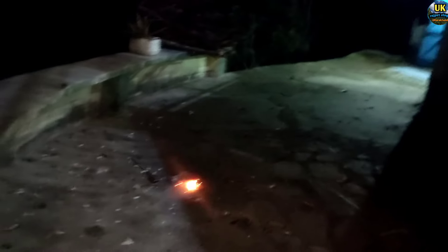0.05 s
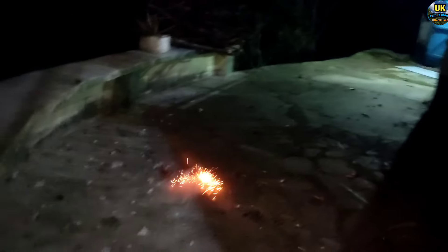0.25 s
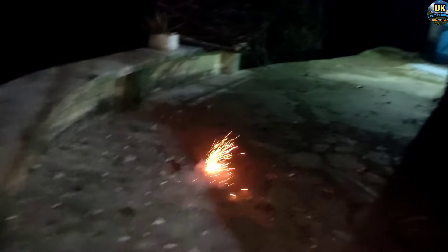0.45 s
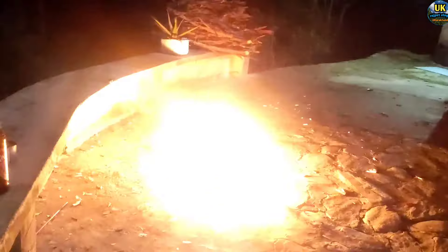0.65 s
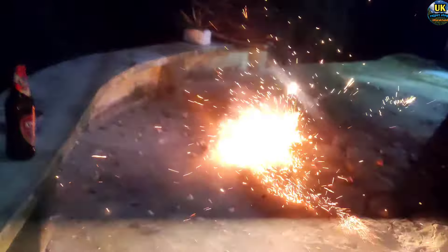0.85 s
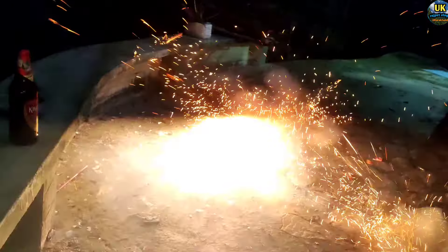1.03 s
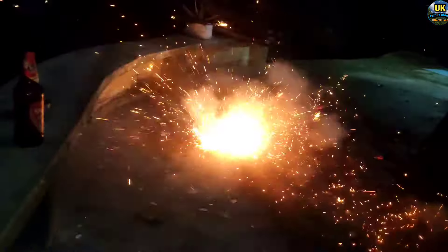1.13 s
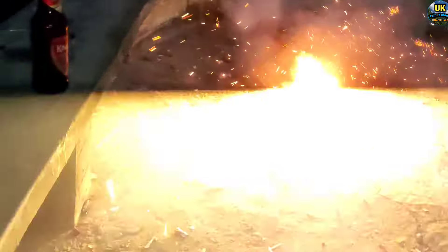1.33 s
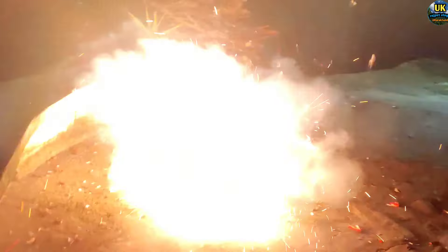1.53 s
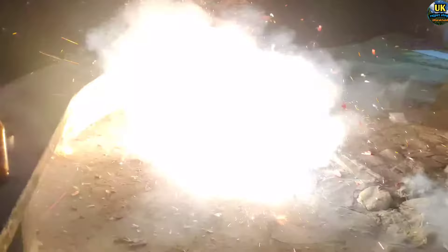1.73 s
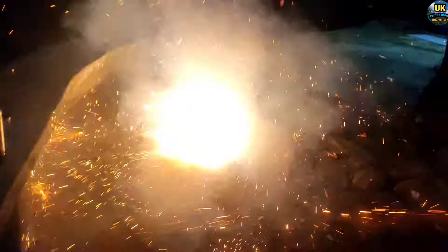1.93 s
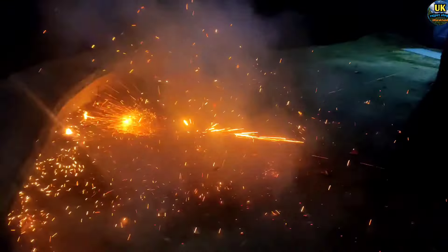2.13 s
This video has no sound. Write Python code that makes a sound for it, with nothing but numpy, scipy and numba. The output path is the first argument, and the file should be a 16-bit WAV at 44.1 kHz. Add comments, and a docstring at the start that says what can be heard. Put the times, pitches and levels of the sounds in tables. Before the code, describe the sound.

A string of firecrackers bursts on a stone terrace at night: a very faint fuse fizz, then a sudden irregular volley of deafening cracks, low thumps and dense echoes, overloading a phone microphone a few metres away.

```python
"""A stone terrace at night: a string of firecrackers goes off a few metres from a phone.
A fuse of three flickering noise bands fizzes. Each blast is a short push-pull pressure pulse with a bright
burst, then dense noise echoes of the low walls and a longer tail from the surroundings; two muffled booms
and a slow membrane wobble add bass. The microphones overload; a look-ahead limiter ducks before a blast,
holds, and lets the tail swell back."""
import sys
import numpy as np
from scipy import signal
from scipy.fft import rfft, irfft
from scipy.io import wavfile
from scipy.ndimage import uniform_filter1d, minimum_filter1d
from numba import njit

SR = 44100
rng = np.random.default_rng(int(sys.argv[2]) if len(sys.argv) > 2 else 0)


def log_audio(samples):
    """Write samples as a 16-bit WAV file to the path given in sys.argv[1]."""
    # one column per channel
    frames = np.atleast_2d(samples).T
    # limit to full scale, then quantise
    limited = np.clip(frames, -1, 1)
    pcm = np.round(limited * 32767).astype(np.int16)
    wavfile.write(sys.argv[1], SR, pcm)


def magnitude_from_level(level_db):
    """Linear magnitude for a level in decibels (20 dB per decade)."""
    exponent = np.asarray(level_db, float) / 20
    return 10 ** exponent


N = 96226  # length in samples

# The blasts; each layer adds its own gain to the levels. Each row: start in seconds, level in dB,
# treble tilt in dB per octave above 1 kHz, low thump in dB, lag of the left echoes in samples.
BLASTS = [(0.7026, 13, -1, -18, 23), (.7670, 26.5, 3, 13.5, -4.5), (0.918, 26.5, 2, 10, 10.5),
          (0.963, 18, 4.5, -40, 17), (.995, 22.5, 3, 4.5, 20.5), (1.028, 15, 3, 2.5, 13),
          (1.077, 20, 2.5, 0.5, 20), (1.383, 25, 2, -22, 18), (1.5351, 26.5, 2.5, 13, 18.5),
          (1.603, 13, 2.5, -12, 18.5), (1.6541, 27.5, 2.5, 8, 16), (1.7665, 28, 2.5, 12, 17.5),
          (1.8727, 25, 2, 12, 13), (2.0189, 27.5, 2, 13.5, 15.5)]
RISE_S = 0.0004  # time constant of the onset of echoes and cracks


def read(table, hz):
    """Value of a table on a log-frequency axis."""
    a = np.array(table, float)
    return np.interp(np.log(hz), np.log(a[:, 0]), a[:, 1])


def unit(x):
    """Scale to rms 1."""
    return x / np.sqrt(np.mean(x ** 2))


def colour(x, table):
    """Shape noise by a (Hz, dB) table, silent outside it, and scale it to rms 1."""
    a = np.array(table, float)
    hz = np.arange(N // 2 + 1) * SR / N + 1
    inside = (hz > a[0, 0]) * (hz < a[-1, 0])
    return unit(irfft(rfft(x) * magnitude_from_level(read(table, hz)) * inside, N))


def band(x, hz, width):
    """Two-pole band-pass."""
    return signal.lfilter(*signal.iirpeak(hz, hz / width, fs=SR), x)


def fall(s, t60, rise, hold=0.):
    """Envelope that rises, holds and dies away after a blast at s (all in seconds)."""
    u = np.maximum(np.arange(N) / SR - s, 0)
    return (1 - np.exp(-u / rise)) * magnitude_from_level(-60 * (np.hypot(u, hold) - hold) / t60)


def pulses():
    """The direct shock of each blast: a push and a pull; duller blasts rise slower and push longer."""
    pulse_s, pulse_db = 0.00093, 12  # length at zero tilt, gain
    out, t = 0, np.arange(N) / SR
    for s, level_db, tilt, _, _ in BLASTS:
        u = np.clip((t - s) / (pulse_s * magnitude_from_level(-tilt)), 0, 50)
        push_pull = (1 - np.exp(-u / 0.62)) * (1 - u) * np.exp(-u)
        out = out + magnitude_from_level(level_db + pulse_db) * push_pull
    return out


def cracks():
    """First reflections off the stones: a bright band of noise bursts just after each shock."""
    crack_hz, t60_s, crack_db = 2130, 0.026, -10.5
    env = 0
    for s, level_db, tilt, _, _ in BLASTS:
        env = env + magnitude_from_level(level_db + crack_db + 2 * tilt) * fall(s + 0.0008, t60_s, RISE_S)
    n = rng.standard_normal((3, N))
    return env * unit(band(n[1:] + 0.2 * n[0], crack_hz, 0.4 * crack_hz))


def echoes():
    """Dense echoes band by band: treble comes first; part is shared between the sides, the left one lagged."""
    # Echo spectrum. Each row: frequency in Hz, level in dB per kHz of bandwidth.
    echo_spectrum = [(60, -10.5), (120, -12), (250, -2.5), (420, -0.5), (800, 1.5), (1200, -5.5),
                     (2200, -12.5), (3500, -19), (7000, -28.5), (10000, -28.5), (16000, -27.5)]
    # Resonances of the terrace. Each row: frequency in Hz, width in Hz, level in dB.
    resonances = [(203, 10, -20.5), (376.3, 22.4, -13.5)]
    # Decay of the near walls. Each row: frequency in Hz, time to fall 60 dB in seconds.
    near_t60 = [(60, 0.45), (400, 0.14), (2000, 0.2), (8000, 0.23), (15000, 0.092)]
    # Decay of the far surroundings. Each row: frequency in Hz, time to fall 60 dB in seconds.
    far_t60 = [(60, 0.3), (500, 0.44), (2000, 0.4), (8000, 0.3), (15000, 0.1)]
    # Likeness of the sides. Each row: frequency in Hz, shared part of the power from 0 to 1.
    likeness = [(60, 0.93), (250, 0.97), (600, 0.66), (1500, 0.15), (5000, 0.13), (15000, 1)]
    # Stereo balance. Each row: frequency in Hz, left minus right in dB.
    balance = [(60, -10.5), (110, 5), (200, -1.5), (380, 1.5), (700, -0.5), (1290, -3.5), (2380, -2),
               (4400, -4.5), (8120, 0.5), (15000, -6.5)]
    body_hold_s = 0.044  # the near echoes stay full about this long before dying
    far_db, far_rise_s = -7.5, 0.028
    rise_cycles, grain_db = 4.75, 1.5

    out, t = np.zeros((2, N)), np.arange(N)
    b = np.array(BLASTS, float)
    latest = np.clip(np.searchsorted(b[:, 0], t / SR) - 1, 0, None)
    lag = b[latest, 4]
    grain = magnitude_from_level(grain_db * unit(uniform_filter1d(rng.standard_normal(N), size=90)))
    # half-octave centres; each level includes its bandwidth
    bands = [(hz, hz / 3, read(echo_spectrum, hz) + 10 * np.log10(hz / 3000))
             for hz in 60 * 2 ** np.arange(0, 8.1, .5)]
    for hz, width, db in bands + resonances:
        power = 0
        for s, level_db, tilt, _, _ in BLASTS:
            gain = magnitude_from_level(level_db + db + tilt * max(np.log2(hz / 1000), 0))
            near = fall(s, read(near_t60, hz), RISE_S + rise_cycles / hz, body_hold_s)
            far = magnitude_from_level(far_db) * fall(s, read(far_t60, hz), far_rise_s)
            power = power + gain ** 2 * (near ** 2 + far ** 2)
        n = rng.standard_normal((3, N)) * grain
        n = unit(band(band(n, hz, 1.62 * width), hz, 1.62 * width))
        c = np.clip(read(likeness, hz), 0, 1)
        shared = np.array([np.interp(t - lag, t, n[0]), n[0]])
        pan = magnitude_from_level(read(balance, hz) / 2 * np.array([[1], [-1]]))
        out += np.sqrt(power) * pan * (np.sqrt(c) * shared + np.sqrt(1 - c) * n[1:])
    return out


def thuds():
    """Muffled blasts: short booms of low cosines and rough noise, nearly the same in both microphones."""
    # The booms. Each row: start in seconds, level in dB, time to fall 60 dB in seconds.
    booms = [(.7030, 16.5, 0.12), (1.61, 14.5, 0.058)]
    # Their low modes. Each row: frequency in Hz, level in dB.
    modes = [(105, 5), (165, 7.5), (270, 3.5), (372, 5.5), (545, -1), (690, -35)]
    rough_db = -11
    out, n = 0, rng.standard_normal((3, N))
    for s, level_db, t60 in booms:
        u = np.arange(N) / SR - s
        for hz, db in modes:
            rough = magnitude_from_level(rough_db) * unit(band(n[0] + 0.75 * n[1:], hz, hz / 3))
            env = magnitude_from_level(level_db + db) * fall(s, t60, 0.0018, 0.004)
            out = out + env * (np.cos(2 * np.pi * hz * u) + rough)
    return out


def thump():
    """Overloaded membranes wobble as low noise after a blast; their rest position swings back slowly."""
    wobble_hz, wobble_t60_s, wobble_db = 35.5, 0.14, 12
    drift_hz, drift_t60_s, drift_db = 3.34, 1., -4
    t = np.arange(N) / SR
    power, swing = 0, 0
    for s, _, _, low_db, _ in BLASTS:
        power = power + (magnitude_from_level(low_db + wobble_db) * fall(s, wobble_t60_s, 0.0039)) ** 2
        drift = np.sin(2 * np.pi * drift_hz * (t - s))
        swing = swing + magnitude_from_level(low_db + drift_db) * fall(s, drift_t60_s, 0.005) * drift
    n = rng.standard_normal((3, N))
    wobble = unit(band(n[1:] + 0.76 * n[0], wobble_hz, 1.47 * wobble_hz))
    return np.sqrt(power) * wobble - swing


def fuse():
    """The fuse fizzes: three bands of partly shared noise swell and fade under one quick flicker."""
    # Loudness over time. Each row: time in seconds, bass in dB, middle in dB, treble in dB.
    fizz = [(0.0, -64, -62, -67), (0.08, -65, -64, -67.5), (0.112, -59.5, -59, -67),
            (0.19, -58, -60.5, -69), (0.234, -58, -56.5, -63), (0.3, -58, -57, -54.5),
            (0.39, -61, -65, -72), (0.454, -64, -67, -68), (0.482, -58, -61, -63), (0.544, -64, -70, -72),
            (0.568, -55, -61.5, -63), (0.598, -55, -64, -63), (0.655, -56.5, -64, -67.5)]
    # Spectrum of the bass. Each row: frequency in Hz, relative density in dB per Hz.
    bass_spectrum = [(18, -37), (30, -2.5), (201, -15), (271, -13), (302, -10), (382, -11.5), (1250, -17.5),
                     (1620, -24), (2750, -120)]
    # Spectrum of the middle. Each row: frequency in Hz, relative density in dB per Hz.
    middle_spectrum = [(740, -24), (1250, -11.5), (1380, -7.5), (2230, -6.5), (2450, -11), (3700, -13),
                       (4810, -30), (8140, -120)]
    # Spectrum of the treble. Each row: frequency in Hz, relative density in dB per Hz.
    treble_spectrum = [(2180, -31), (3700, 1), (4390, 5), (7440, 0.5), (9510, 2), (14100, 0), (16000, -30)]
    t, a = np.arange(N) / SR, np.array(fizz, float)
    n = rng.standard_normal((9, N))
    flicker = magnitude_from_level(0.97 * unit(uniform_filter1d(rng.standard_normal(N), size=600)))
    bass = colour(n[:2] + 1.55 * n[2], bass_spectrum)
    middle = colour(n[6:8] + 0.5 * n[8], middle_spectrum)
    treble = colour(n[3:5] + 0.5 * n[5], treble_spectrum)
    gains = [magnitude_from_level(np.interp(t, a[:, 0], a[:, k])) for k in range(1, 4)]
    return flicker * (bass * gains[0] + middle * gains[1] + treble * gains[2])


def scene():
    """Blasts with their bursts, echoes, booms and wobble, over the fuse."""
    return pulses() + cracks() + echoes() + thuds() + thump() + fuse()


def microphones(x):
    """The membranes saturate softly, then a response curve colours the treble."""
    # Microphone response. Each row: frequency in Hz, gain in dB.
    response = [(1500, 1), (2400, 2.5), (3000, 0), (5000, 0), (7200, 3), (8200, -2.5), (9500, -9),
                (10800, -6), (13500, -2.5), (15300, 1)]
    top = magnitude_from_level(27.5)  # overload level
    x = top * np.tanh((np.abs(x) / top) ** 2) ** .5 * np.sign(x)
    hz = np.arange(N + 1) * SR / N / 2 + 1
    return irfft(rfft(x, 2 * N) * magnitude_from_level(read(response, hz)))[:, :N]


@njit
def release(need, step):
    """Follows rises at once, falls by a factor per sample."""
    e, out = 0., np.empty(len(need))
    for i in range(len(need)):
        e = max(need[i], e * step)
        out[i] = e
    return out


def limiter(x):
    """Turns both sides down ahead of a peak above 1, holds, then recovers at a steady rate in dB."""
    ahead_s, hold_s, release_db_s, attack_s = 0.0077, 0.068, 224.5, 0.003
    ahead, hold = int(ahead_s * SR), int(hold_s * SR)
    peak = np.pad(np.abs(x).max(axis=0), (hold, ahead))
    # sliding maximum from hold before to ahead after each sample
    need = -minimum_filter1d(-peak, ahead + hold + 1)[(ahead + hold) // 2:][:N]
    env = release(np.maximum(need, 1.), magnitude_from_level(-release_db_s / SR))
    return x * uniform_filter1d(1 / env, int(attack_s * SR) + 1)


def top_cut(x):
    """Nothing passes above the cut-off."""
    return signal.sosfilt(signal.butter(12, 16410, fs=SR, output="sos"), x)


def record(dry):
    """Microphones saturate and colour, the limiter ducks, the top is cut and the loudest peaks clip."""
    x = limiter(microphones(dry))
    low_pass = signal.butter(12, 15700, fs=SR, output="sos")
    x = signal.sosfiltfilt(low_pass, x)
    mix = np.clip(x * magnitude_from_level(1.), -1, 1)  # 1 dB of gain into the clipping
    return top_cut(mix)


dry = scene()
out = record(dry)
log_audio(out)
```